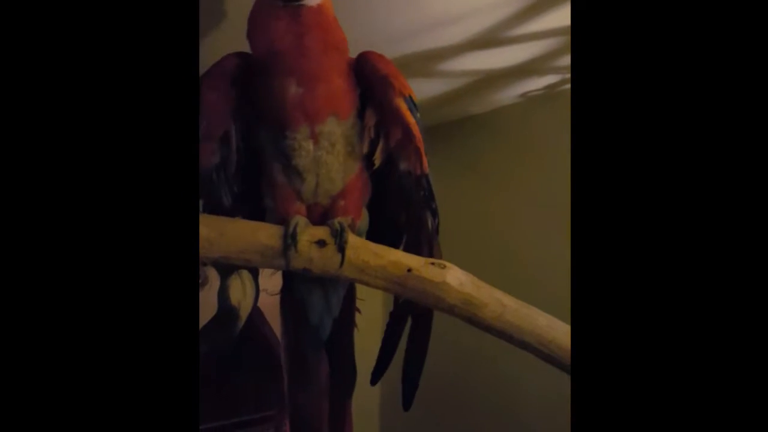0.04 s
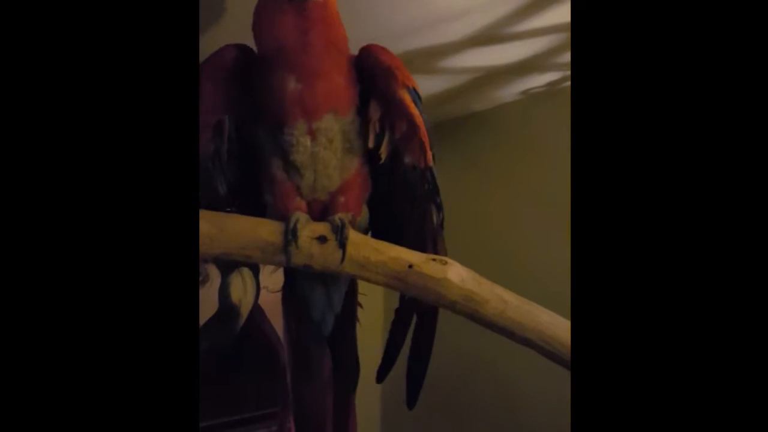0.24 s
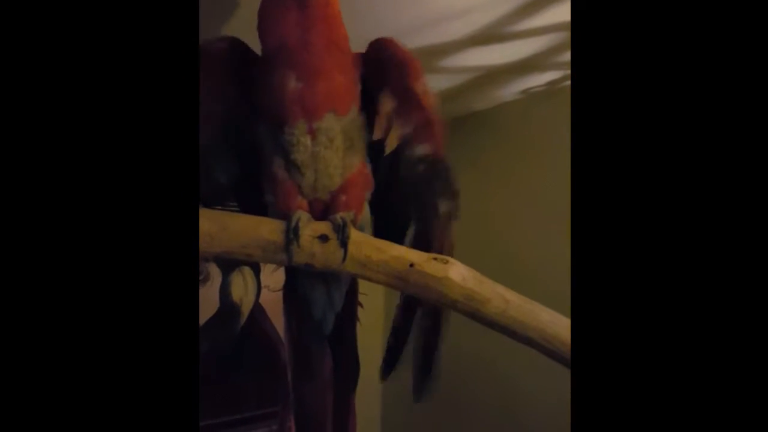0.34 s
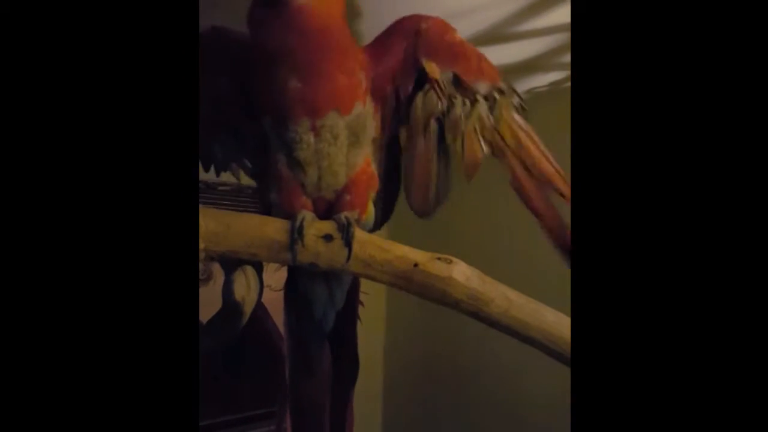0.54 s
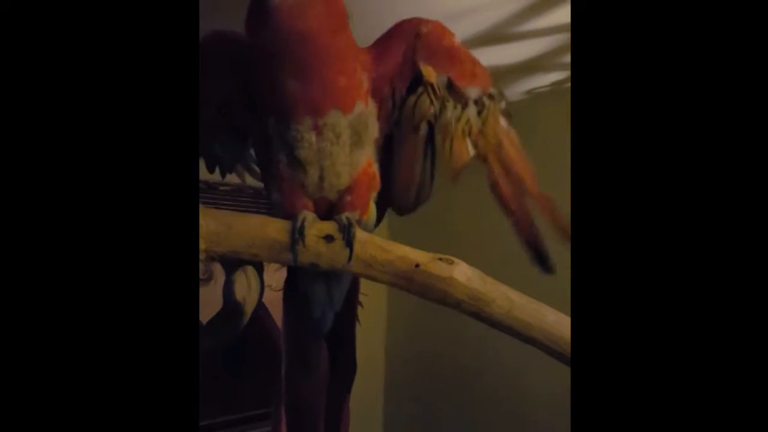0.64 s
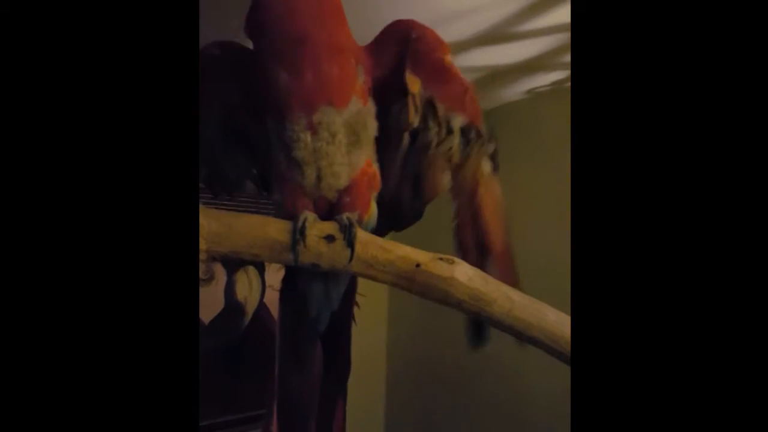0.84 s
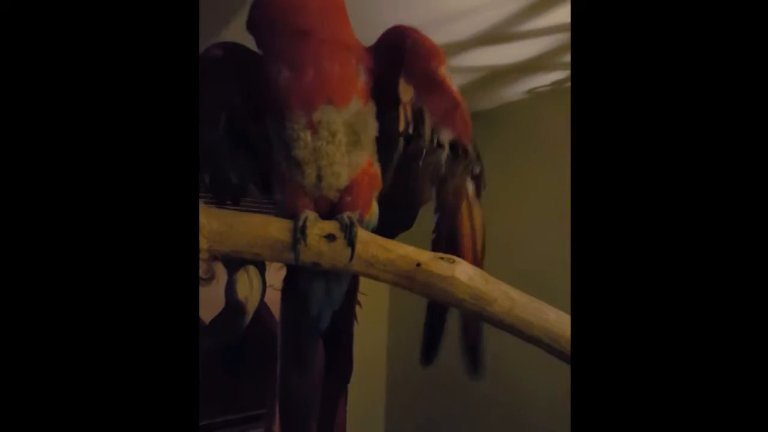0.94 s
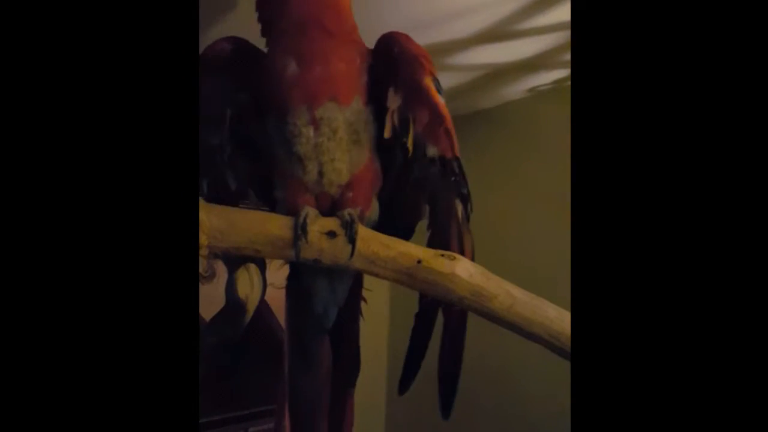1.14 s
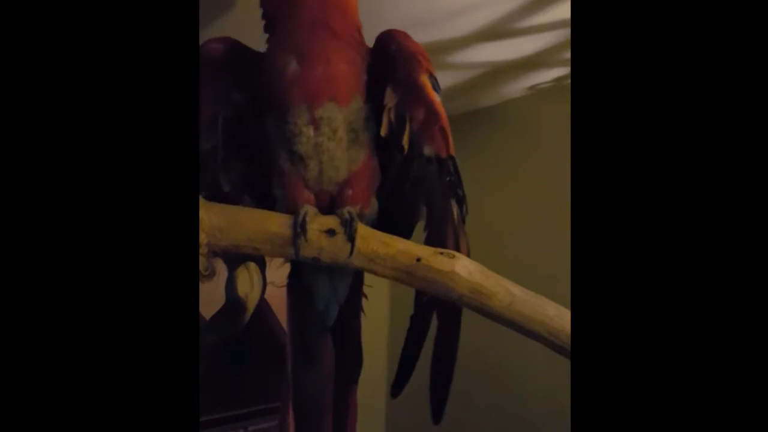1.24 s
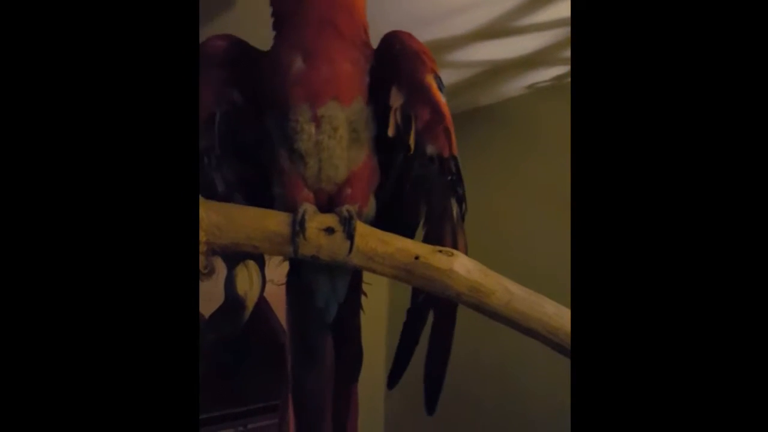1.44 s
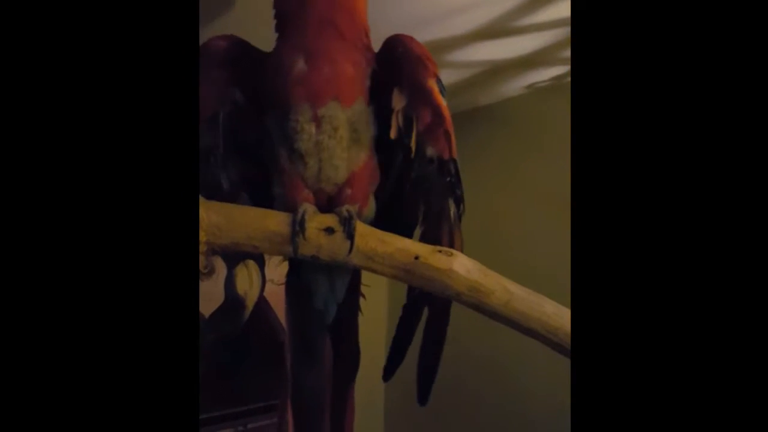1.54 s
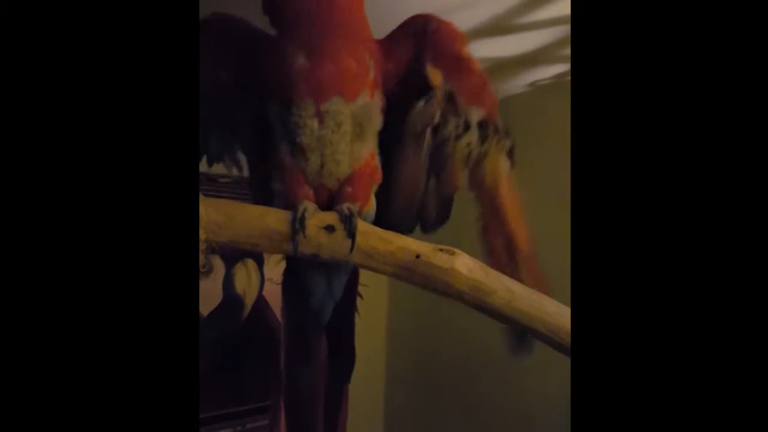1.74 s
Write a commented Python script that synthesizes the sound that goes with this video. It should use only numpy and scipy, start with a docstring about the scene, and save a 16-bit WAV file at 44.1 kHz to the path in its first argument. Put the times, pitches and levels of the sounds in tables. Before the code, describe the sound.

Close by in a small room, a large parrot clicks its beak softly and makes three quick, raspy calls. After a short pause, three more follow with faint clicks, over a very quiet household hum and hiss.

```python
"""Low hum and faint hiss fill a small living room. A perched macaw clicks its beak, then gives three short,
raspy calls (0.2-0.6 s); the background level dips at the first. A call is a few bursts about 30 ms apart: the
syrinx snaps open and shut unevenly, and each snap rings the throat and open beak. Three more calls follow
(1.3-1.8 s), two after faint clicks. Some calls carry a soft thump, the last of each group a hollow note. The
room rings briefly throughout; two close microphone ports hear the bird, the left one first."""
import sys
import numpy as np
from scipy import signal
from scipy.fft import rfft, irfft
from scipy.io import wavfile
from scipy.ndimage import uniform_filter1d, minimum_filter1d

SR = 44100
rng = np.random.default_rng(int(sys.argv[2]) if len(sys.argv) > 2 else 0)


def master_out(mix):
    """Clip the mix to full scale and print it as 16-bit PCM to the path in sys.argv[1]."""
    frames = np.transpose(np.atleast_2d(mix))
    ceiling = np.clip(frames, -1, 1)
    pcm = np.round(ceiling * 32767).astype(np.int16)
    wavfile.write(sys.argv[1], SR, pcm)


N = 79380

# voice spectrum before the resonances: (frequency [Hz], relative level [dB])
VOICE_SPECTRUM = [(40, -49.5), (150, -25), (280, -16), (380, -16.5), (490, -10.5), (610, -17.5), (800, -4),
                  (1200, -1), (2000, 3), (2950, -6.5), (4200, -7), (5500, -20), (6500, -21), (7200, -19.5),
                  (7900, -19.5), (8700, -16.5), (9800, -25.5), (11500, -29.5), (14500, -34)]


def from_db(db):
    """Decibels to gain."""
    return 10 ** (np.asarray(db) / 20)


def unit_rms(x):
    """Scale to an rms of 1."""
    return x / np.sqrt(np.mean(x ** 2) + 1e-20)


def at_hz(points, hz):
    """Read a table on a log-frequency axis."""
    table = np.array(points)
    return np.interp(np.log(np.maximum(hz, 1)), np.log(table[:, 0]), table[:, 1])


def add(out, start_s, sound):
    """Mix a sound in at a time."""
    i = int(start_s * SR)
    out[:, i:i + sound.shape[-1]] += sound[..., :N - i]


def ring(x, hz, boost_db, q):
    """Ringing that a resonance adds to x, lifting a narrow band."""
    return (from_db(boost_db) - 1) * signal.lfilter(*signal.iirpeak(hz, q, fs=SR), x + 1e-18)


def coloured(x, spectrum, treble_db=0, size=4096):
    """Minimum-phase filter following a spectrum, with a shelf above 4.8 kHz."""
    hz = np.arange(size // 2 + 1) * SR / size
    shelf = 1 / (1 + (4800 / np.maximum(hz, 1)) ** 12)
    cepstrum = irfft(np.log(from_db(at_hz(spectrum, hz) + treble_db * shelf)))
    cepstrum[1:size // 2] *= 2  # fold onto positive time: causal
    cepstrum[size // 2 + 1:] = 0
    return signal.fftconvolve(x, irfft(np.exp(rfft(cepstrum))))[:len(x)]


def diffuse_bands(size):
    """Diffuse stereo noise in half-octave bands; yields (centre [Hz], band)."""
    # likeness at the two ports: (frequency [Hz], correlation [0-1])
    likeness = [(60, 0.1), (290, .78), (640, 1), (1400, 0), (3100, 0), (15000, 0.12)]
    white = rng.standard_normal((2, 2, size + SR // 4))
    edges_hz = np.geomspace(18, 17000, 21)
    for k, (low_hz, high_hz) in enumerate(zip(edges_hz, edges_hz[1:])):
        bandpass = signal.butter(2, [low_hz, high_hz], "band", fs=SR, output="sos")
        mid, side = signal.sosfilt(bandpass, white[k % 2])[:, -size:]
        hz = np.sqrt(low_hz * high_hz)
        alike = at_hz(likeness, hz)
        yield hz, np.sqrt(1 + alike) * mid + np.sqrt(1 - alike) * np.array([side, -side])


def house_hum():
    """Low hum of the house with faint hiss; the background level dips at the first call, later partly recovers."""
    # noise spectrum: (frequency [Hz], relative density [dB])
    spectrum = [(20, -10), (55, -16), (85, -8), (125, -7.5), (220, -16.5), (420, -15), (700, -28),
                (1500, -27), (3000, -32.5), (6000, -39.5), (14000, -41.5)]
    # level contour: (time [s], level [dB])
    contour = [(0, -60), (0.231, -58.5), (.27, -68.5), (1.0, -68.5), (1.8, -63.5)]
    noise = sum(band * from_db(at_hz(spectrum, hz)) for hz, band in diffuse_bands(N))
    hum = unit_rms(noise + ring(noise, hz=85, boost_db=7, q=2.3))
    return hum * from_db(np.interp(np.arange(N) / SR, *np.transpose(contour)))


def beak_clicks(size=4096):
    """Each click is one light snap ringing two modes of the beak."""
    # clicks: (time [s], level as rms over 2 ms [dB], lower mode [Hz])
    clicks = [(0.0898, -44, 2810), (1.2882, -43.5, 2480), (1.688, -38.5, 2350)]
    out = np.zeros((2, N))
    snap = coloured(signal.unit_impulse(size), VOICE_SPECTRUM)
    for start_s, db, hz in clicks:
        click = snap + ring(snap, hz, boost_db=22.5, q=9) + ring(snap, 1.9 * hz, boost_db=14, q=9)
        add(out, start_s, from_db(db) * unit_rms(click) * np.sqrt(.002 * SR / size))
    return out


def syrinx_burst(length_s, swell_db, count=16, size=4096):
    """Unevenly spaced snaps of the syrinx, each followed by a puff of air noise."""
    snap_hz, jitter, shimmer_db = 562.1, .3, 1.5
    rasp_gain, rasp_decay_s = .24, .00082
    gaps_s = np.exp(jitter * rng.standard_normal(count)) / snap_hz
    times_s = np.cumsum(gaps_s) - gaps_s[0]
    snap_db = shimmer_db * rng.standard_normal(count) + swell_db * times_s / length_s
    inside = times_s < length_s
    snaps = np.zeros(size)
    snaps[(times_s[inside] * SR).astype(int)] = from_db(snap_db[inside])
    pole = np.exp(-1 / (rasp_decay_s * SR))
    puffs = signal.lfilter([np.sqrt(1 - pole ** 2)], [1, -pole], snaps) * rng.standard_normal(size)
    return rasp_gain * puffs - snaps


def calls():
    """Syrinx bursts ring the throat and open beak, as shaped for each call."""
    # throat shape per call: (time [s], low resonance [Hz], boost [dB], middle [Hz], boost [dB],
    # beak [Hz], boost [dB], its lean to the right [dB], upper [Hz], boost [dB],
    # top [Hz], boost [dB], treble shelf [dB])
    throats = [ (0.23, 848, 7, 1720, 5.5, 2765, 17, 2, 3255, 8.5, 8100, 2.5, 0.5),
               (0.40, 988, 13.5, 1570, 9.5, 2740, 16.5, -1, 3250, 12, 7200, 4, 3.5),
               (0.56, 805.5, 12, 1530, 4.5, 2678, 17.5, 4, 3180, 7, 8000, 7, 0),
               (1.32, 810, 7, 1905, 11.5, 2585, 13.5, -1.5, 3300, 6.5, 5980, 11, 0),
               (1.44, 769, 11.5, 1830, 5.5, 2530, 17, -2, 3360, 6.5, 8680, 1, 0.5),
               (1.70, 667, 17, 1480, 7, 2558, 19, -1.5, 3650, 7, 7000, 12.5, -7)]
    # syrinx bursts: (time [s], length [s], level [dB], swell over the length [dB])
    bursts = [ (0.237, 0.01, -5, -7.5), (0.2488, 0.0049, -17, -29), (0.2643, 0.016, -9.5, 2.5),
              (0.29, 0.0027, -19.5, -1), (0.2954, .0045, -16, 1.5), (0.4041, .0040, -20, -4),
              (0.4297, .0075, -16.5, -4.5), (0.46, .0085, -28, 13), (0.5666, 0.0042, -22.5, 18),
              (0.59, 0.014, -14.5, 0), (0.625, .0070, -16, -8.5), (1.3340, 0.0124, -11, 0),
              (1.3596, 0.0066, -5, 2.5), (1.3803, 0.0074, -15.5, 7), (1.45, 0.018, -16, 0.5),
              (1.4798, 0.0075, -12.5, -0.5), (1.497, 0.0087, -20, -1), (1.7083, 0.0056, -22.5, 11),
              (1.741, .0140, -37.5, 2)]
    treble_fade_db_per_s = 35.5  # later bursts of a call are duller
    out = np.zeros((2, N))
    for start_s, length_s, db, swell_db in bursts:
        shape = min(throats, key=lambda row: abs(row[0] - start_s))
        (call_s, low_hz, low_db, middle_hz, middle_db, beak_hz, beak_db, lean_db,
         upper_hz, upper_db, top_hz, top_db, treble_db) = shape
        treble_db -= treble_fade_db_per_s * (start_s - call_s)
        voice = coloured(syrinx_burst(length_s, swell_db), VOICE_SPECTRUM, treble_db)
        throat = (voice + ring(voice, low_hz, low_db, q=9.5) + ring(voice, middle_hz, middle_db, q=6.8)
                  + ring(voice, upper_hz, upper_db, q=16) + ring(voice, top_hz, top_db, q=18))
        beak = np.array([ring(throat, beak_hz, beak_db + side * lean_db, q=20.2) for side in (-1, 1)])
        add(out, start_s, from_db(db) * unit_rms(throat + beak) * np.sqrt(length_s * SR / len(throat)))
    return out


def thumps(length_s=.033, cutoff_hz=215):
    """Short, low-pitched swells of air pressure."""
    # swells: (time [s], level [dB])
    swells = [(0.252, -46.5), (0.589, -70.5), (1.452, -71)]
    out, size = np.zeros((2, N)), int(length_s * SR)
    lowpass = signal.butter(2, cutoff_hz, fs=SR, output="sos")
    for start_s, db in swells:
        rumble = signal.sosfilt(lowpass, rng.standard_normal(SR // 4))[-size:]
        add(out, start_s, from_db(db) * unit_rms(rumble * np.hanning(size)))
    return out


def hollow_notes(edge_s=.0053):
    """The low throat resonance rings on as a soft, nearly pure note."""
    # notes: (time [s], length [s], pitch [Hz], level [dB])
    notes = [(0.569, 0.024, 765.5, -36), (1.713, .046, 723.6, -39.5)]
    out, t = np.zeros((2, N)), np.arange(N) / SR
    for start_s, length_s, hz, db in notes:
        envelope = np.clip(np.minimum(t, length_s - t) / edge_s, 0, 1)
        add(out, start_s, from_db(db) * np.sqrt(2) * envelope * np.sin(2 * np.pi * hz * t))
    return out


def at_ports(x):
    """Direct sound reaches the right port slightly after the left."""
    # right-port delay: (frequency [Hz], lag [s])
    port_lag = [(300, .00012), (780, .00015), (1500, 0.00026), (3000, 0.00032), (5000, .00028),
                (8300, .00025), (14000, .00026)]
    hz = np.arange(N + 1) * SR / (2 * N)
    delay = np.exp(-2j * np.pi * hz * at_hz(port_lag, hz))
    right = irfft(rfft(x[1], 2 * N) * delay)[:N]
    return np.array([x[0], right])


def room(x):
    """Early scatter off perch, wall and ceiling; a tail that builds, holds and dies band by band."""
    # tail decay: (frequency [Hz], T60 [s])
    t60 = [(200, 0.43), (750, 0.26), (1500, 0.21), (2700, 0.22), (5000, 0.2), (12000, 0.14)]
    # tail spectrum: (frequency [Hz], relative level [dB])
    colour = [(150, -8), (800, 1.5), (2500, 0), (6000, 5.5), (13000, -2)]
    tail_db, build_s, hold_s = -7.5, .009, .024
    early_db, early_onset_s, early_decay_s = -6, .0007, .0038
    t = np.arange(SR // 2) / SR
    dying_s = np.maximum(t - hold_s, 0)
    tail = sum(band * from_db(at_hz(colour, hz) - 60 * dying_s / at_hz(t60, hz))
               for hz, band in diffuse_bands(len(t)))
    tail *= np.minimum(t / build_s, 1)
    early = sum(band for _, band in diffuse_bands(len(t)))
    early *= (t > early_onset_s) * np.exp(-t / early_decay_s)
    response = (from_db(tail_db) * unit_rms(tail) + from_db(early_db) * unit_rms(early)) / np.sqrt(len(t))
    return signal.fftconvolve(x.mean(axis=0)[None], response, axes=1)[:, :N]


def scene():
    """The macaw, slightly left, in its room."""
    bird = beak_clicks() + calls() + hollow_notes()
    return at_ports(bird) + room(bird) + thumps() + house_hum()


def record(dry):
    """Rumble cut, fast peak limiter, top cut."""
    low_cut_hz, top_cut_hz = 35, 14900
    ceiling, window = .96, int(.003 * SR)
    x = signal.sosfilt(signal.butter(2, low_cut_hz, "high", fs=SR, output="sos"), dry)
    gain = minimum_filter1d(ceiling / np.maximum(np.abs(x).max(axis=0), ceiling), window)
    limited = x * uniform_filter1d(gain, window)
    return signal.sosfilt(signal.ellip(10, .3, 80, top_cut_hz, fs=SR, output="sos"), limited)


dry = scene()
out = record(dry)
master_out(out)
```